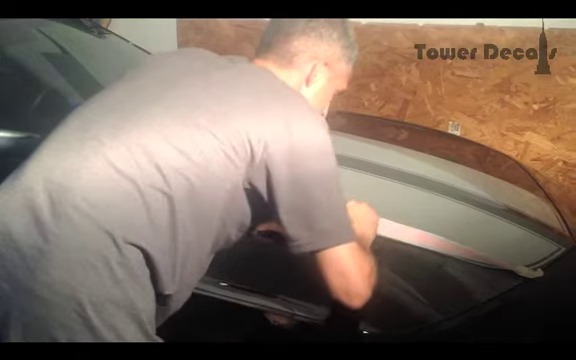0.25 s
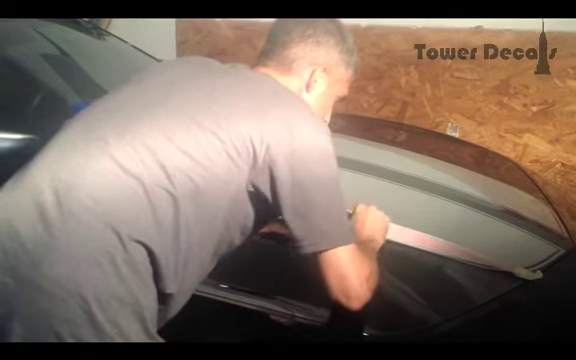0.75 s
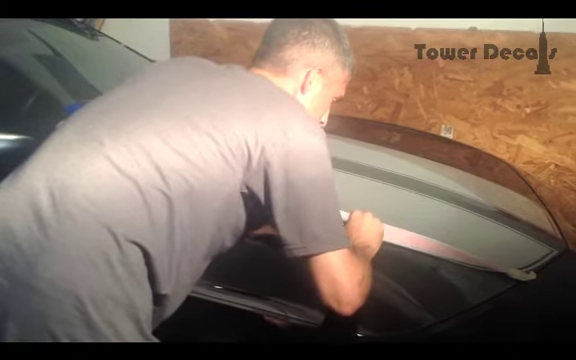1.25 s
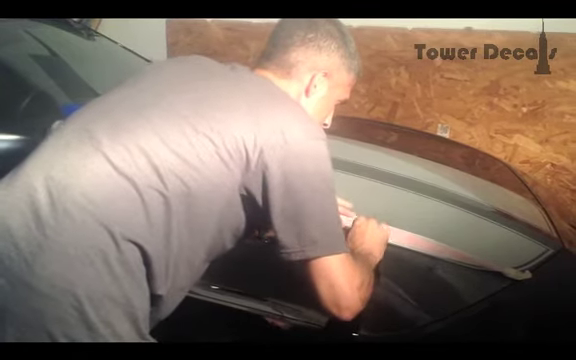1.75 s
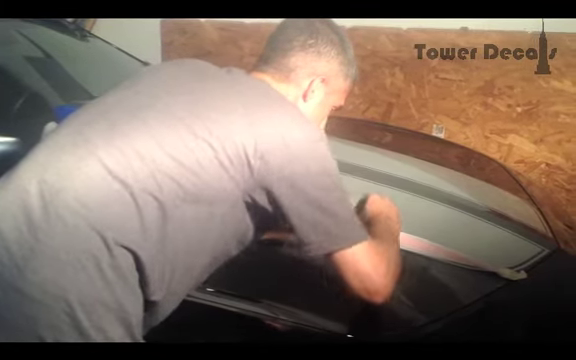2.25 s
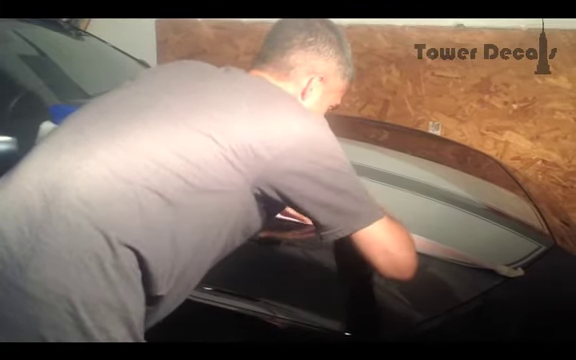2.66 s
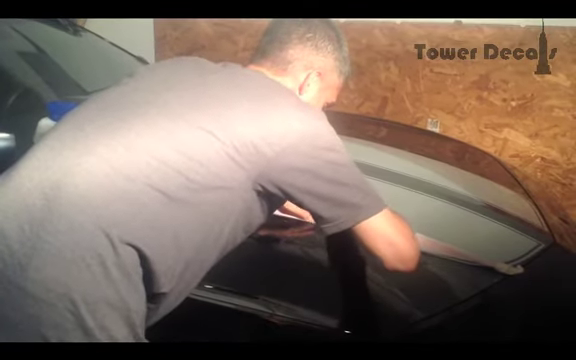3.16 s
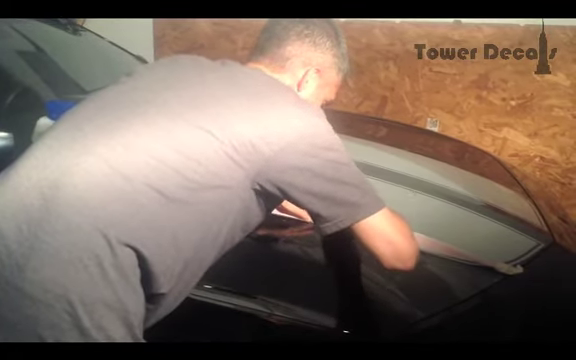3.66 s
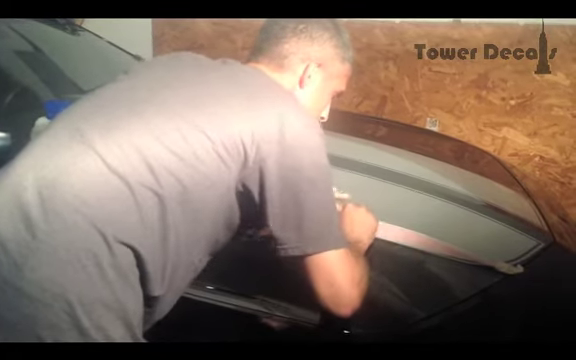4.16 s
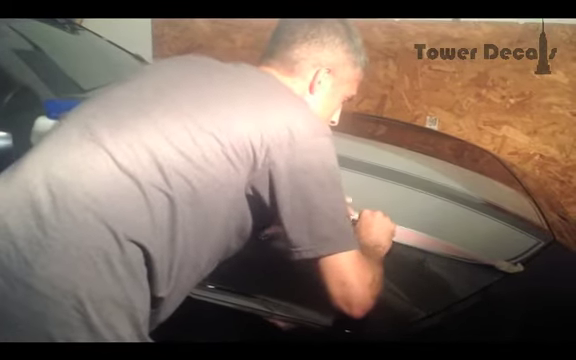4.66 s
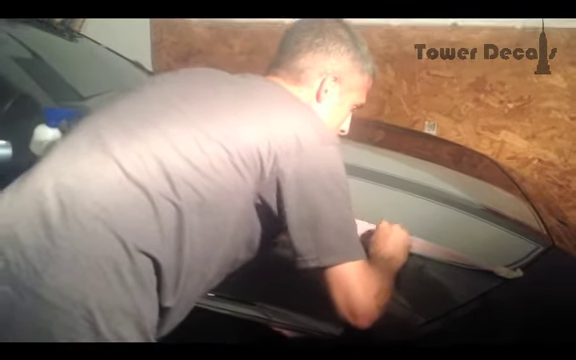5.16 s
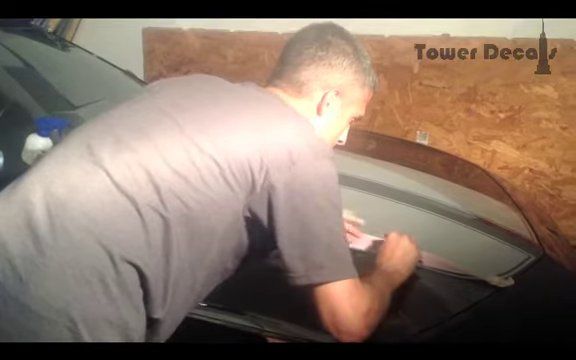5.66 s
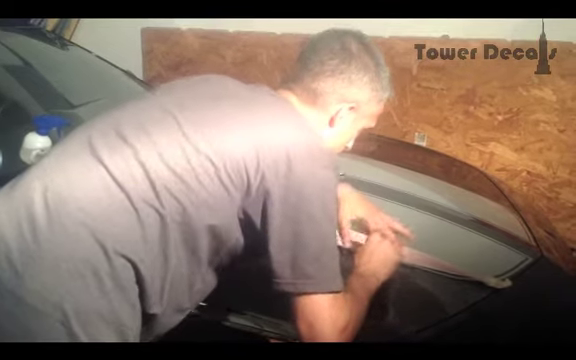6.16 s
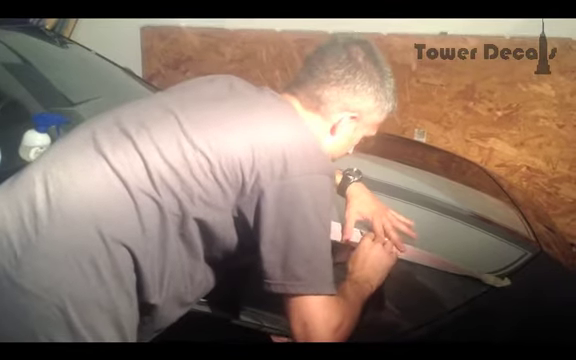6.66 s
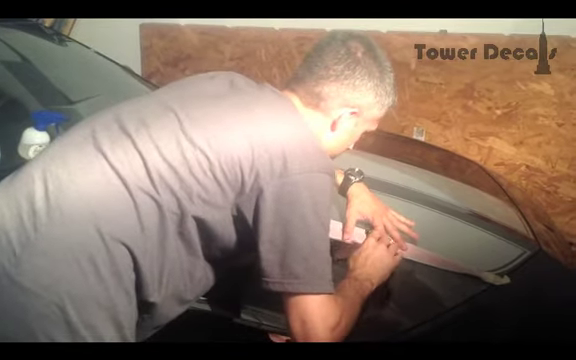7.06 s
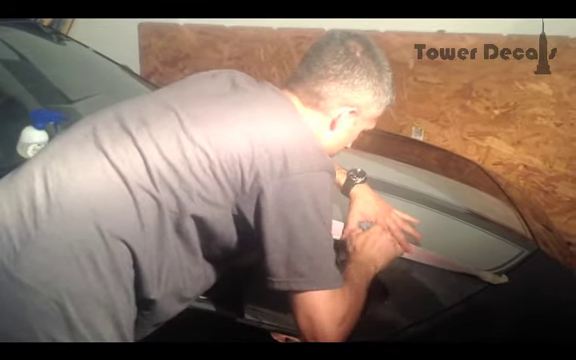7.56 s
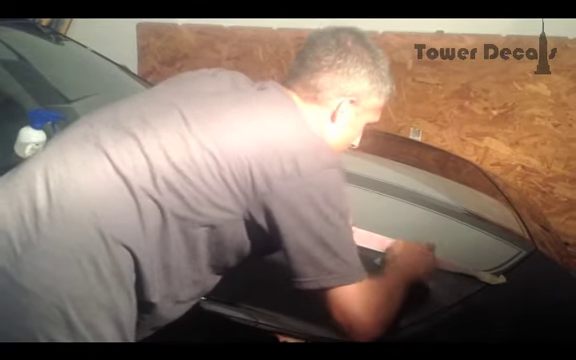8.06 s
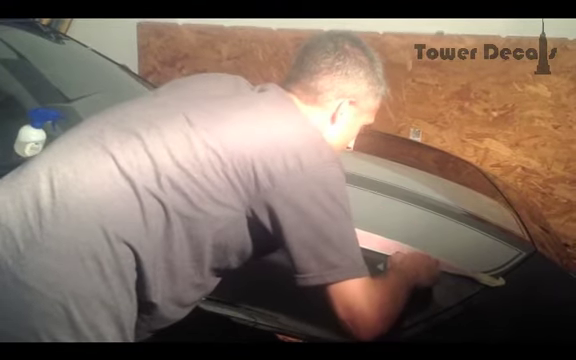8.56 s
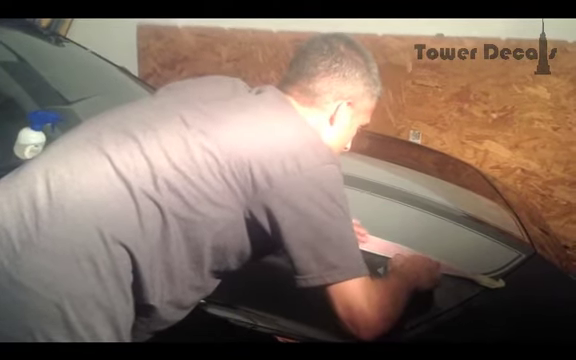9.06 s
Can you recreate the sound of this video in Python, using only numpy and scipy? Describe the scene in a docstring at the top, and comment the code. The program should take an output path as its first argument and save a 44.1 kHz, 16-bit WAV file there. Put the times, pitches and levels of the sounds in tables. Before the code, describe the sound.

Quick squeaky-hissing squeegee rubs on wet vinyl over a car hood, hollow metal bumps, then an outside engine swells, booms and recedes.

```python
"""Squeegee strokes beside a booming engine

Friction noise and ringing modes give short rubs of a squeegee over wet vinyl on a car hood, with bumps,
bright clicks and soft high brushes. Harmonics of a slow-turning engine, weighted by standing waves, boom
in the garage as it nears and leaves. Coloured noise gives the street and the vehicle's roar; a gliding sine
hum fades at the start. Sparse random reflections give the echo of the open garage."""
import sys
import numpy as np
from scipy import signal
from scipy.io import wavfile
from scipy.ndimage import uniform_filter1d

SR = 44100
rng = np.random.default_rng(int(sys.argv[2]) if len(sys.argv) > 2 else 0)


def how_loud(loudness_db):
    """Turn decibels into a plain amplitude multiplier (0 dB gives 1, 20 dB gives 10)."""
    steps = np.asarray(loudness_db, float) / 20
    return 10 ** steps


def transcribe(u):
    """Save the signal u as a 16-bit wav file named by the first command-line argument.

    u: samples, shape (n,) or (channels, n), limited to [-1, 1]; the rate is SR.
    q: integer samples, one column per channel.
    """
    v = np.clip(np.atleast_2d(u).T, -1, 1)
    q = np.round(v * 32767).astype(np.int16)
    wavfile.write(sys.argv[1], SR, q)


N = 410115

# Rotation of the engine. Each row: time in seconds, full firing cycles per second.
CYCLE_RATE = [(3.7, 10.02), (4.1, 9.87), (4.3, 10.0), (4.6, 10.68), (4.9, 11.08), (5.5, 11.74),
              (6.1, 12.07), (6.5, 12.1), (6.9, 12.2), (7.7, 12.29), (8.3, 11.87), (9.3, 11.41)]


def evened(x):
    """Normalization: scales a signal to an rms of 1."""
    return x / np.sqrt(np.mean(x ** 2) + 1e-20)


def read(points, hz):
    """Spectral envelope: interpolates (Hz, dB) points along a logarithmic frequency axis."""
    point_hz, point_db = np.transpose(points)
    return np.interp(np.log(hz + 1), np.log(point_hz + 1), point_db)


def lorentzian(hz, centre_hz, width_hz):
    """Resonance: a peak of height 1 that falls to one half at half its width on either side."""
    return 1 / (1 + (2 * (hz - centre_hz) / width_hz) ** 2)


def wander(t, top_hz):
    """Slow random fluctuation: sines of random phase, weaker towards top_hz, sum to an rms of 1."""
    rates = top_hz * np.geomspace(.05, 1, 20)
    return evened(sum(np.sin(2 * np.pi * (f * t + rng.random())) / np.sqrt(f) for f in rates))


def noise(gain, patchy_db, swell_db, size=1024):
    """Filtered noise: random short-time spectra of overall rms 1, coloured by gain(hz), patchy and swelling."""
    hop = size // 4
    frames, hz = N // hop + 5, np.fft.rfftfreq(size, 1 / SR)
    real, imaginary, patches = rng.standard_normal((frames, len(hz), 3)).T
    patches = uniform_filter1d(patches, size=10, axis=0)  # over frequency
    patches = evened(uniform_filter1d(patches, size=12, axis=1))  # over time
    swell = wander(np.arange(frames) * hop / SR, 7.6)
    field = how_loud(patchy_db * patches + swell_db * swell)
    spectra = (real + 1j * imaginary) * gain(hz)[:, None] * field
    return evened(signal.istft(spectra, nperseg=size, noverlap=size - hop)[1][:N])


def street():
    """Amplitude modulation: rumble, traffic and roar are noises with moving levels; the roar throbs with the cycle."""
    # Street background. Each row: time in seconds, level of distant rumble in dB, level of traffic in dB.
    background = [(0, -50, -51), (1.3, -50.5, -51), (2.55, -45.5, -51.5), (3.1, -48, -53.5),
                  (3.9, -44, -49.5), (4.3, -36.5, -50.5), (5.2, -49, -51.5), (6.2, -41, -51.5),
                  (7.1, -59, -52), (7.8, -60, -64.5), (8.6, -60, -63), (9.3, -53, -61.5)]
    # Vehicle roar, nearing then leaving. Each row: loudest at seconds, level there in dB,
    # seconds from there until it is 10 dB down.
    roars = [(5.5, -43.5, 1.71), (6.6, -47.5, 1.99)]
    # Relative spectra of the four noises. Each row: frequency in Hz, level in dB before the doorway's lift.
    rumble_colour = [(24, -63), (40, -64), (70, -20), (102, -36.5), (116, -16), (172, -3.5), (215, -5.5),
                     (284, -11.5), (340, -13.5), (440, -31.5), (750, -120)]
    traffic_colour = [(200, -60), (340, 0), (380, 0), (405, 6), (476, 3.5), (549, 4.5), (946, 3),
                      (1220, -0.5), (1710, 0.5), (1940, -5.5), (6440, -18), (12800, -23.5), (15500, -27)]
    nearing_colour = [(200, -18), (340, -6.5), (446, -7.5), (732, -9.5), (916, -15.5), (1010, -21.5),
                      (1390, -21.5), (1680, -23), (2310, -27.5), (5940, -40), (15500, -46)]
    leaving_colour = [(250, -11.5), (420, 2), (631, -13.5), (723, -10), (1090, -13), (1230, -6),
                      (1490, -10), (1740, -12), (1900, -10.5), (4630, -27), (6560, -29), (15500, -36.5)]
    # Doorway and walls colour these noises. Each row: frequency in Hz, width in Hz, lift in dB.
    doorway = [(654, 24, 2), (800, 153, 4), (999, 24, 6), (1130, 36, 4.5), (1663, 54, 2.5), (6380, 1430, 4)]
    t = np.arange(N) / SR
    s, *steady = np.transpose(background)
    levels = [np.interp(t, s, db) for db in steady]
    levels += [db - 10 * ((t - at) / fall) ** 2 for at, db, fall in roars]
    turns = np.cumsum(np.interp(t, *np.transpose(CYCLE_RATE))) / SR
    throb = 1 + 0.078 * np.cos(2 * np.pi * turns)

    def lift_db(hz):
        """Resonant transmission: the lifts of all peaks add in dB."""
        return sum(db * lorentzian(hz, f, width) for f, width, db in doorway)

    colours = (rumble_colour, traffic_colour, nearing_colour, leaving_colour)
    rumble, traffic, nearing, leaving = (
        how_loud(db) * noise(lambda hz: how_loud(read(colour, hz) + lift_db(hz)), 1.76, 1.0, size=2048)
        for db, colour in zip(levels, colours))
    # an earlier vehicle drives off: its hum sinks from 171 Hz and fades, far faster after 0.66 s
    hum_hz, sag_hz_per_s = 171, 21
    hum_db = -49 - 7 * t + 2.9 * wander(t, 7.7) - 90 * np.maximum(t - .66, 0)
    hum = np.sqrt(2) * how_loud(hum_db) * np.sin(2 * np.pi * (hum_hz - sag_hz_per_s * t / 2) * t)
    return rumble + traffic + hum + throb * (nearing + leaving)


def garage(x, t60):
    """Reverberation: sparse reflections of random sign decay by 60 dB in t60 seconds."""
    at = np.arange(200, SR // 2, 22)  # one reflection in every 22 samples
    taps = np.zeros(SR // 2 + 22)
    signs = rng.choice([-1., 1.], len(at))
    taps[at + rng.integers(0, 22, len(at))] = signs * how_loud(-60 * at / SR / t60)
    return signal.fftconvolve(x, taps / np.linalg.norm(taps))[:N]


def bumps():
    """Modal excitation: as blade or knuckle bumps the hood, a short contact force rings the sheet metal's modes."""
    # Blows. Each row: time in seconds, relative level in dB, decay time of the force in seconds,
    # frequency in Hz around which modes are favoured.
    blows = [(.316, -31.5, 0.0056, 940), (2.8, -45, 0.009, 700), (3.045, -36.5, 0.021, 960),
             (3.249, -35.5, .012, 1140), (3.458, -33, 0.0089, 800), (4.2568, -38, .0006, 3000),
             (8.97, -40.5, 0.004, 800)]
    # Modes of the hood. Each row: frequency in Hz, relative level in dB, time to decay by 60 dB in seconds.
    hood = [(326.7, -11, 0.087), (390, 8, 0.15), (525, 16.5, 0.014), (684, 3, 0.063), (823, -1.5, 0.27),
            (1033, 0.5, 0.033), (1199, 1, 0.11), (1474, 2.5, 0.063), (1645, 4, 0.037), (1900, -12, .04),
            (2330, -1, 0.037), (3700, -12, .02)]
    t, out = np.arange(SR // 4) / SR, np.zeros(N + SR)
    jolts = rng.standard_normal((len(blows), 3000))
    for (s, db, soft, centre_hz), jolt in zip(blows, jolts):
        ring = 0
        for hz, mode_db, t60 in hood:
            favour_db = -8.8 * np.log2(hz / centre_hz) ** 2
            ring = ring + how_loud(mode_db + favour_db - 60 * t / t60) * np.sin(2 * np.pi * hz * t)
        force = jolt * np.exp(-t[:3000] / soft)
        force[:8] += .6 * np.linalg.norm(force) * np.hanning(8)  # the first contact is one sharp push
        blow = signal.fftconvolve(ring / abs(ring).max(), force / np.linalg.norm(force))
        out[round(s * SR):][:len(blow)] += how_loud(db) * blow
    return out[:N]


def squeegee():
    """Sliding friction: hiss swells and fades with the speed of each stroke while the blade's resonances ring along."""
    # Strokes. Each row: middle in seconds, nominal length in seconds, relative level in dB,
    # extra level of the blade's ring in dB.
    strokes = [(0.552, 0.086, -59.5, 4), (0.655, 0.049, -58, 3), (0.772, 0.067, -54, 2.5),
               (0.888, 0.067, -54.5, -4), (1.02, 0.077, -53, -3), (1.155, 0.098, -58, -1),
               (1.319, 0.073, -58, 1.5), (1.44, 0.11, -60, 2), (1.614, 0.08, -66.5, 6.5),
               (1.735, 0.073, -60, 4), (1.86, 0.091, -56, 1), (1.996, 0.13, -61, 1.5),
               (2.43, 0.11, -71.5, 7), (2.522, 0.039, -63, 4), (2.624, 0.095, -59.5, -2),
               (2.825, 0.11, -62, 2), (2.961, 0.061, -63.5, 2), (3.06, 0.048, -56, -1),
               (3.156, 0.035, -60.5, 2), (3.26, 0.036, -55, 3.5), (3.462, 0.039, -58, 1),
               (3.574, 0.048, -57.5, 2.5), (3.667, 0.064, -57, 0), (4.26, 0.05, -75, 12),
               (4.35, 0.035, -65, 4), (4.571, 0.13, -64.5, 2), (4.7, 0.08, -66.5, 7),
               (4.81, 0.098, -58.5, 0), (4.923, 0.11, -58.5, 1), (5.069, 0.12, -56.5, -1),
               (5.197, 0.098, -55.5, -9), (5.425, 0.3, -52, -4.5), (5.989, 0.37, -49.5, 0.5),
               (8.121, 0.067, -79, 0.8), (8.991, 0.072, -70.5, -7)]
    # Friction hiss. Each row: frequency in Hz, relative level in dB.
    swish_colour = [(700, -28), (1500, 3.5), (3000, -4.5), (6000, -2), (9000, -2.5), (13000, -4.5),
                    (15500, -5)]
    # Ring of the edge in quick rubs. Each row: frequency in Hz, width in Hz, relative level in dB.
    edge_modes = [(2360, 800, 2), (4070, 300, -9), (5650, 740, -2.5), (6390, 680, -1.5)]
    # Ring of the blade laid flat in long wipes. Each row: frequency in Hz, width in Hz, relative level in dB.
    flat_modes = [(4120, 800, -1), (6700, 1100, 0), (9100, 750, -0.5)]
    swish, ring = np.zeros(N), np.zeros((2, N))
    t = np.arange(N) / SR
    for s, length, db, ring_db in strokes:
        near = slice(max(round((s - length) * SR), 0), round((s + length) * SR))
        ramp = min(.028, 0.5 * length)  # the hand starts and stops in about the same time on most strokes
        speed = .5 - .5 * np.tanh((abs(t[near] - s) - 0.36 * length) / ramp)
        speed *= signal.windows.tukey(len(speed), .5)
        swish[near] += how_loud(db) * speed
        is_wipe = int(length > .16)
        ring[is_wipe, near] += how_loud(db + ring_db - 4) * speed
    # the edge catches and slips
    grit = 1 + 0.17 * evened(uniform_filter1d(rng.exponential(1, N) ** 2 - 2, size=60))
    sound = swish * noise(lambda hz: how_loud(read(swish_colour, hz)) * (hz > 300), 1.5, .5, size=256)
    for strength, modes in zip(ring, (edge_modes, flat_modes)):
        peaks = lambda hz: sum(how_loud(db) * lorentzian(hz, f, width) for f, width, db in modes)
        sound += strength * noise(peaks, 1.5, .5, size=256)
    return how_loud(3.5) * grit * sound


def clicks_and_brushes():
    """Noise bursts: decaying high-passed noise gives bright clicks and, with a longer decay, soft high brushes."""
    # Bursts. Each row: time in seconds, level at the onset in dB before the high-pass,
    # decay time in seconds.
    bursts = [(1.002, -40, 0.002), (3.447, -49, .002), (4.338, -50, .002), (5.3095, -31, 0.002),
              (6.081, -41, 0.0019), (6.418, -38, 0.0025), (8.09, -65, 0.039), (8.171, -61, .004),
              (8.968, -58, 0.022)]
    t, out = np.arange(4000) / SR, np.zeros(N)
    for (s, db, decay), burst in zip(bursts, rng.standard_normal((len(bursts), 4000))):
        out[round(s * SR):][:4000] += how_loud(db) * burst * np.exp(-t / decay)
    return signal.sosfilt(signal.butter(2, 7500, "high", fs=SR, output="sos"), out)


def drones():
    """Narrow-band noise: resonances 110 Hz wide swell and fade over a fraction of a second to several seconds."""
    # Swells in the street noise. Each row: middle in seconds, length between the 1/e points in seconds,
    # centre frequency in Hz, level in dB.
    swells = [(1.286, 0.18, 810, -50.5), (6.6, 1.83, 1690, -57), (7.5, 5.2, 1260, -64),
              (8.305, 1.3, 760, -60.5)]
    t, out = np.arange(N) / SR, np.zeros(N)
    for s, length, centre_hz, db in swells:
        swell = np.exp(-(2 * (t - s) / length) ** 4)
        out += how_loud(db) * swell * noise(lambda hz: lorentzian(hz, centre_hz, 110), 1.2, 3.4)
    return out


def engine():
    """Harmonic series in a resonant room: standing waves weight each multiple of the firing cycle."""
    # Uneven firing favours some multiples of the cycle: relative level in dB of multiples 7 to 32.
    order_db = [-14.5, -4, -14, -9, 0, -7, -3, -7.5, 4, 11.5, 8.5, 15, 18, 12.5, 9, 8.5, -2, 0, -1, 1.5,
                -2.5, -11.5, -7, -7, -8, -10]
    # Standing waves. Each row: frequency in Hz, width in Hz of the resonance before it is squared.
    booms = [(95, 6), (127.5, 14), (178.5, 11), (176, 52), (235, 48), (270, 15), (307.5, 16), (355, 46)]
    # Engine at the doorway as it nears and leaves. Each row: time in seconds, relative level in dB.
    approach = [(2.7, -85), (3.7, -67), (4.1, -60.5), (4.35, -45.5), (4.7, -47), (5.1, -40), (5.6, -39),
                (6.5, -42), (6.9, -39.5), (7.2, -40), (7.9, -48), (8.5, -55.5), (9.3, -56)]
    # Rolling along, the engine passes loud and quiet spots, one row for each standing wave.
    # Each row: mean in dB, nominal swing in dB, at a loud spot at seconds, seconds to the next loud spot.
    spots = [(-12.5, 15.4, 6.46, 3.62), (1.8, 3.1, 6.75, 3.03), (-7.1, 11.4, 6.67, 1.91),
             (-.6, 2.1, 5.79, 2.4), (-3.9, 4.6, 6.42, 2.12), (-2.5, 7, 5.5, 2.7), (-1.2, 9, 8.79, 5.68),
             (-6, 1.4, 4.49, 1.73)]
    spot_edge = 1.5  # larger = wider spots with sharper borders
    t = np.arange(N) / SR
    coarse = np.arange(0, N / SR + .02, 1 / 100)  # slow changes are computed 100 times per second
    cycle_hz = np.interp(coarse, *np.transpose(CYCLE_RATE))
    turns = np.cumsum(np.interp(t, coarse, cycle_hz)) / SR
    level_db = np.interp(coarse, *np.transpose(approach))
    drives = []
    for db, swing_db, s, apart in spots:
        place = np.tanh(spot_edge * np.cos(2 * np.pi * (coarse - s) / apart))
        drives.append(how_loud(level_db + db + swing_db * place))
    out = np.zeros(N)
    for k, db in enumerate(order_db, 7):
        # neighbouring standing waves add or cancel, so single multiples drop out for a while
        response = sum(drive / (1 + 2j * (k * cycle_hz - hz) / width) ** 2
                       for (hz, width), drive in zip(booms, drives))
        # the paths of the echoes change as the engine moves: phases (radians) and levels (dB) drift
        phase = 2 * np.pi * rng.random() + .2 * wander(coarse, 6) + .7 * wander(coarse, 1.2)
        fading_db = 1.3 * wander(coarse, 3)
        air = np.sqrt(2) * response * how_loud(db + fading_db) * np.exp(1j * phase)
        out += (np.interp(t, coarse, air) * np.exp(2j * np.pi * k * turns)).real
    return out


def scene():
    """Superposition: work on the hood and street noise, each with its reverberation, add to the engine."""
    rubbing, knocks, outside = squeegee() + clicks_and_brushes(), bumps(), street() + drones()
    # walls swallow the treble
    dull = signal.sosfilt(signal.butter(1, 1200, fs=SR, output="sos"), outside)
    work_echo = garage(how_loud(-4.5) * rubbing + how_loud(2) * knocks, 0.46)
    street_echo = how_loud(-7.5) * garage(dull, 0.1)
    return (rubbing + knocks + engine() + outside + work_echo + street_echo)[None]


def roll_off(x):
    """The treble ends steeply here."""
    return signal.sosfilt(signal.butter(12, 16300, fs=SR, output="sos"), x)


def record(dry):
    """Band limitation: microphone hiss joins the sound, then bass and extreme treble are filtered away."""
    heard = dry + how_loud(-76) * rng.standard_normal(dry.shape)
    heard = signal.sosfilt(signal.butter(3, 60, "high", fs=SR, output="sos"), heard)
    limit = signal.firwin(801, 15350, window=("kaiser", 9), fs=SR)  # low-pass edge in Hz
    finished = signal.oaconvolve(heard, limit[None], "same")
    return roll_off(finished)


dry = scene()
out = record(dry)
transcribe(out)
```